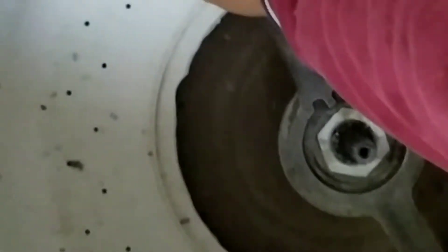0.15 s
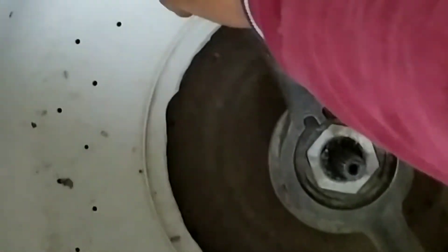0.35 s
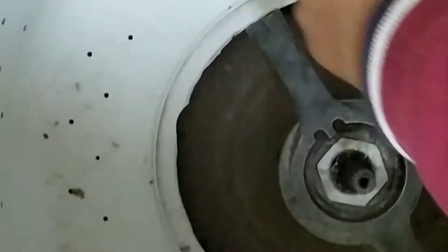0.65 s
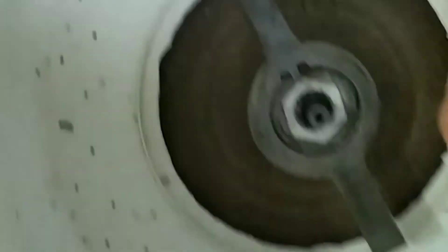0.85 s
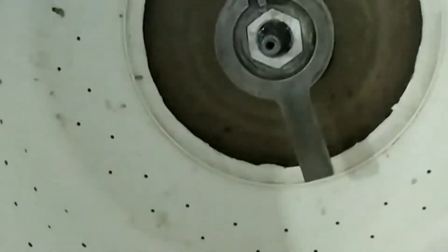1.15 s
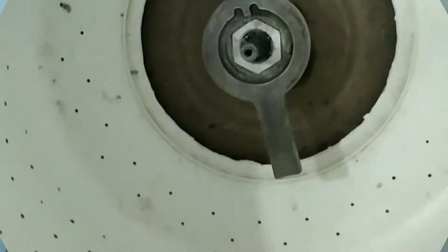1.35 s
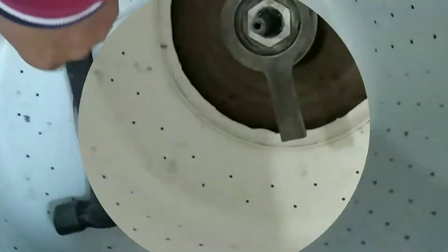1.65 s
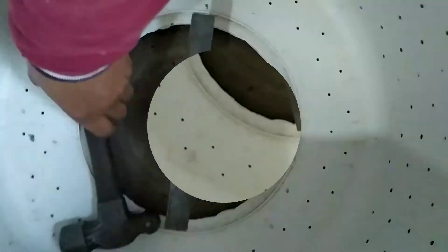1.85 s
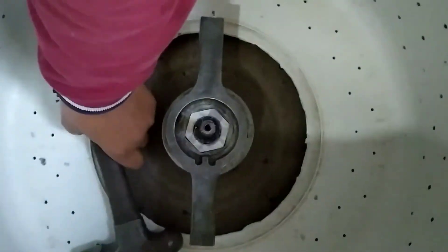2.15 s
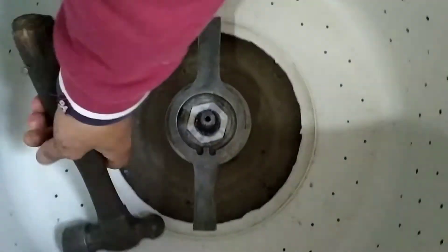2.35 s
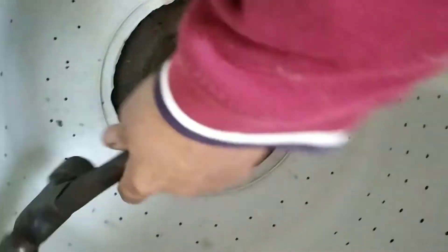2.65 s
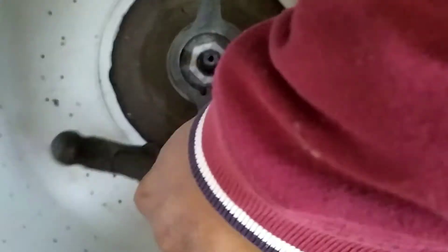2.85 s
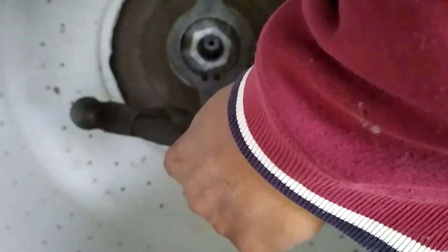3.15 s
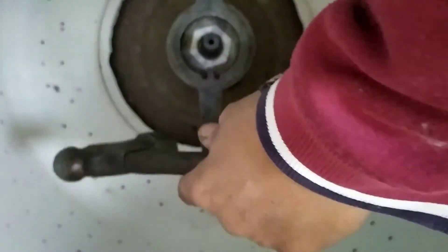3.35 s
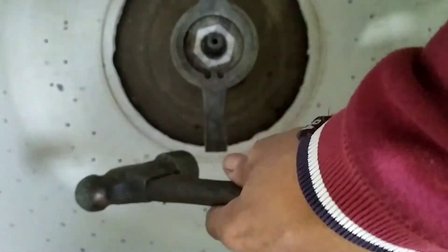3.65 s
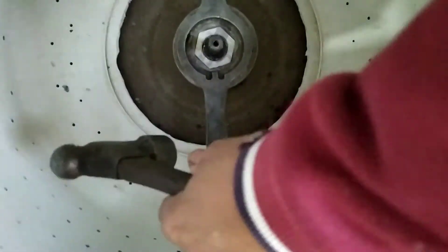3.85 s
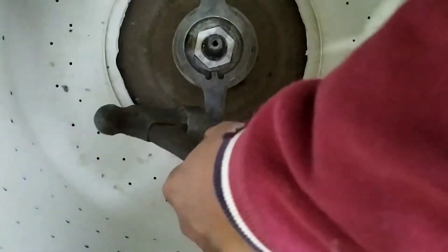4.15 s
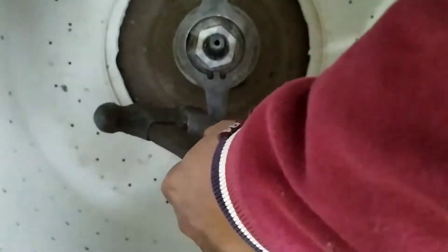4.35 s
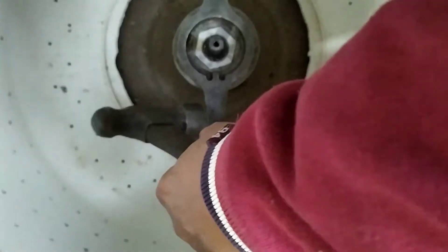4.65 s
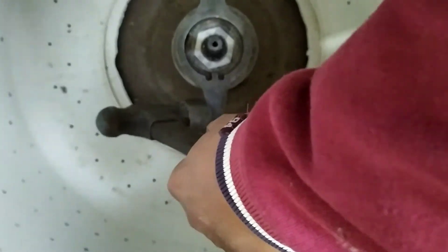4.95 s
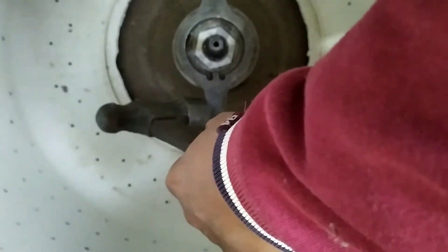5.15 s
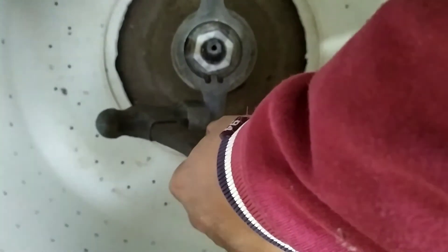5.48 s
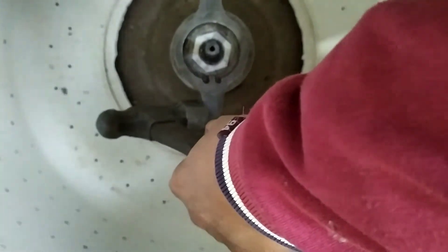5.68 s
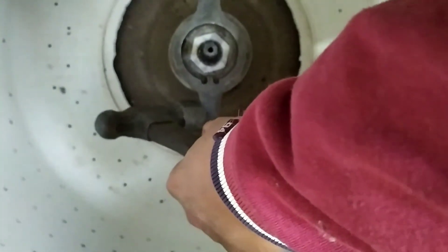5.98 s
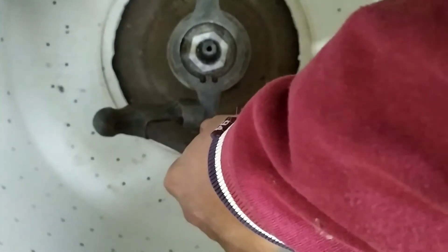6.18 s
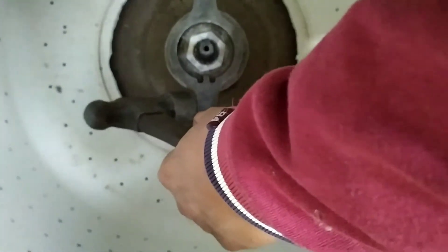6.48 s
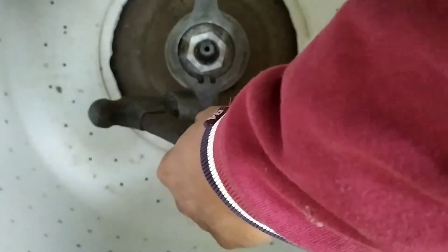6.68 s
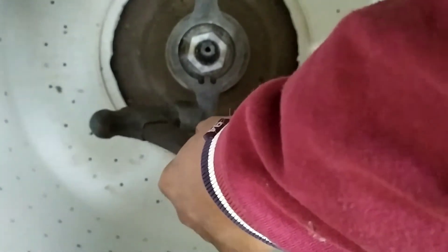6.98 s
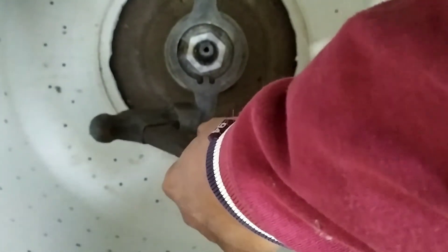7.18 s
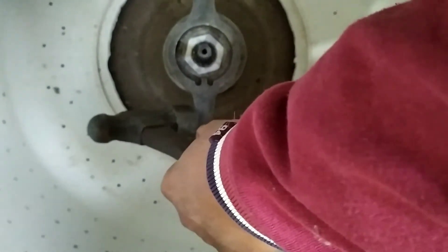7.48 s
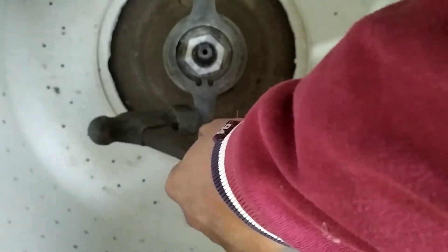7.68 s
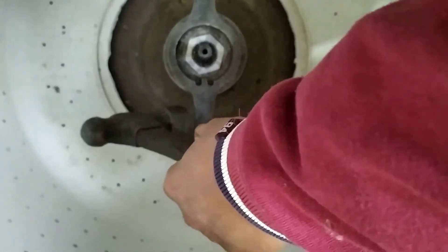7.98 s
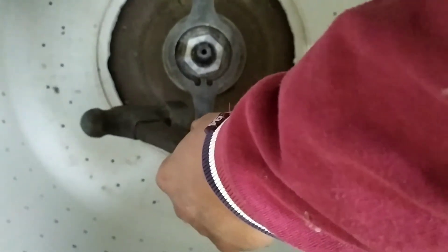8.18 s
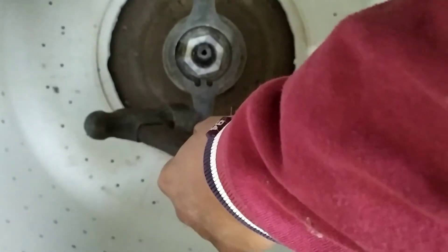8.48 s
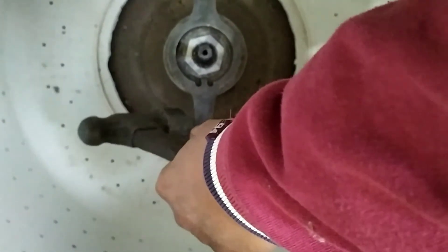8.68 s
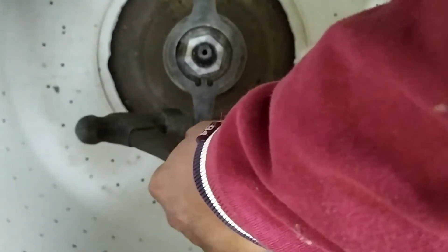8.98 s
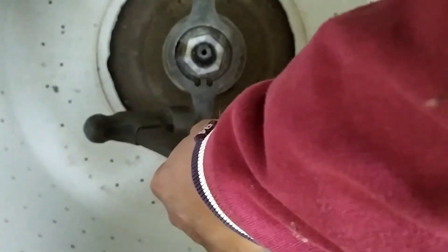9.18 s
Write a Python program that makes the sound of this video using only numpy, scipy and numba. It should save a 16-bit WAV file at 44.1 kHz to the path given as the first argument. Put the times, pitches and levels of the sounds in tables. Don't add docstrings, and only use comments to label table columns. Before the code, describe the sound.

Close, dry sound in a small metal tub. From 0 to 0.5 s, soft dull bumps of hands and sleeves, a faint knock and a small steel clink near 0.4 s, over low rumble and a fading deep thrum. Quiet rustle follows; around 1.7 s the background almost vanishes, then returns. Light bumps at 2.1 s lead to a firm hollow knock at 2.26 s and a harder one at 2.4 s. Quiet handling, with faint distant machinery appearing at 3.6 s. At 4.26 s a hammer clanks on a spanner, then a dense burst of hard blows and chattering bounces runs from 4.63 to 5.05 s, with brief high steel ringing. Small ticks fill the gap. Blows return at 6.8, 7.08 and 7.27 s, a duller one at 7.73 s, then 8.5, 8.9 and 9.3 s, each rattling briefly; the machinery nearly disappears around 8 s.

```python
import sys
import numpy as np
from scipy import signal
from scipy.fft import rfft, irfft, next_fast_len
from scipy.io import wavfile
from scipy.ndimage import uniform_filter1d, minimum_filter1d
from numba import njit

SR = 44100
rng = np.random.default_rng(int(sys.argv[2]) if len(sys.argv) > 2 else 0)


def unload_audio(sound):
    columns = np.transpose(np.atleast_2d(sound))
    steps = np.round(np.clip(columns, -1, 1) * 32767)
    wavfile.write(sys.argv[1], SR, steps.astype(np.int16))


def convert_level_to_amplitude(level_db):
    exponent = np.asarray(level_db, float) / 20
    return 10 ** exponent


N = 411453

# pitch_hz [Hz], level_db [dB], t60_s [s]
TUB_MODES = [(222, -10.5, 0.4), (330.2, -22.5, 0.089), (422, -16.5, 0.93), (463, 8.5, 1), (574.8, 4, 0.39),
             (707, 1.5, 0.61), (800, -12.5, 0.98), (820, -4.5, 0.36), (932, -36, 0.66), (1025, 8.5, 0.32),
             (1130, -20, 0.92), (1238, -18, 0.046), (1380, -14, 0.046), (1434, -20, 0.057),
             (1520, -11.5, 0.33), (1785, 4, 0.72), (1857, -7.5, 0.38), (2186, -5.5, 0.44),
             (2260, -30.5, 0.66), (2140, -15.5, 0.15)]
# pitch_hz [Hz], level_db [dB], t60_s [s]
CABINET_MODES = [(58.3, -11.5, 0.22), (86, -15, 0.17), (117.5, 8.5, 0.18), (110, 1.5, 0.21), (123, 2, 0.25),
                 (167, -8, 0.68), (200, -4.5, 0.12)]
# pitch_hz [Hz], level_db [dB], t60_s [s]
SPANNER_MODES = [(2525, -20, .2), (3160, -23, .12), (3709, -24, .15), (4188, -21, .1), (4727, -19, .13),
                 (4900, -16, .12), (5200, -17, .15), (5550, -24, .15), (6153, -24, .45), (6172, -32, .3),
                 (6761, -17, .08), (7251, -16, .3), (7285, -22, .25), (7790, -16, .15), (8100, -2, .22),
                 (8300, -9, .2), (8450, -11, .2), (8578, -7, .16), (8845, -9, .15), (9050, -12, .15),
                 (9200, -12, .12), (9943, -16, .12), (10900, -18, .15), (11560, -22, .12), (12030, -12, .2),
                 (12480, -11, .22), (13460, -9, .2), (14420, -14, .22), (14710, -14, .24)]
# start_s [s], level_db [dB]
CLINK = [
    (0.4219, -24.5),
]
# pitch_hz [Hz], level_db [dB], t60_s [s]
LOOSE_MODES = [(2280, -10, 0.25), (2890, -10, 0.2), (3170, -6, 0.47), (3710, -4, 0.36), (4695, 3, 0.23),
               (6200, -24, 0.87), (6172, -20, 0.55), (7230, -7, 0.16), (7770, 4.5, 0.2), (8110, -8, 0.48),
               (8560, -1, 0.13), (12470, -24, 0.25), (14370, -14, 0.22)]
# pitch_hz [Hz], level_db [dB per Hz]
RATTLE_SPECTRUM = [(88, -40.5), (150, -12), (271, -26.5), (450, 4), (748, 5), (1030, 6.5), (1410, -3),
                   (2160, -12.5), (4000, -25), (5600, -28), (8800, -71)]
CRACK_SPECTRUM = [(1470, -48), (2500, -8.5), (4190, -19), (4740, -7), (5620, -20.5), (6750, -32),
                  (8200, -6.5), (9000, -11), (9800, -26), (14500, -32.5), (15300, -49.5)]
RUMBLE_SPECTRUM = [(12, -53.5), (20, -35), (37, -20), (64, -1), (119, -1), (150, -18.5), (261, -13),
                   (285, -20.5), (400, -22), (520, -54.5), (880, -120)]
ROOM_SPECTRUM = [(88, -52), (150, -26.5), (263, -6), (286, -5.5), (538, -8), (769, -13), (999, -18.5),
                 (1100, -18), (4000, -47), (5200, -65.5), (8800, -120)]
RUSTLE_SPECTRUM = [(710, -33), (1200, -4), (1890, 1), (3030, -4), (4620, -6.5), (7750, 0.5), (12100, -5),
                   (14000, -7), (15800, -24)]
# pitch_hz [Hz], lead_rad [rad]
PORT_LEAD = [(250, 0), (500, .35), (1120, 1.7), (2070, 2.6), (3270, 1.2), (4800, .9), (7000, .2),
             (14000, .8)]
# pitch_hz [Hz], level_db [dB]
PORT_APART = [(30, -9.5), (70, -25.5), (140, -16.5), (280, -12), (1000, -1.5), (4000, 4), (8000, -8.5),
              (14000, -3)]
# start_s [s], stop_s [s], pitch_hz [Hz], level_db [dB]
SINGING = [
    (4.645, 4.702, 8100, -10),
    (4.9, 4.93, 8234, -22),
    (4.764, 4.87, 7251, -27),
    (5.02, 5.15, 6152, -37),
    (6.797, 6.826, 8101, -25),
    (7.12, 7.2, 6153, -41),
    (7.112, 7.15, 7252, -42),
    (6.81, 6.88, 6153, -44),
    (8.916, 8.953, 8102, -18),
    (8.93, 9.07, 6151, -29),
]
# pitch_hz [Hz], width_hz [Hz], level_db [dB]
WHINE_BANDS = [(566, 61, -4), (1010, 70, -7), (1300, 110, -14), (1740, 270, -11), (2200, 110, -12.5),
               (2500, 170, -9.5), (2770, 90, -20)]
# time_s [s], level_db [dB]
WHINE_COURSE = [
    (0, -99),
    (3.5, -88),
    (3.62, -66.5),
    (4.2, -76),
    (5.6, -75.5),
    (6.7, -75.5),
    (7.2, -74.5),
    (8.0, -95),
    (9.33, -83),
]
# start_s [s], level_db [dB], boom_db [dB re bump], scuff_db [dB re bump], t60_s [s]
BUMPS = [(0.076, -28.5, -14, -21, 0.17), (0.112, -39, 4.5, -14, 0.08), (0.139, -37.5, 7, -8, 0.16),
         (0.187, -31, -20, -11, 0.068), (0.292, -29, 0.5, -20, 0.032), (0.394, -28.5, -13, -17, 0.22),
         (0.417, -22, 5, -10, 0.11), (0.433, -32, 12, -21, 0.058), (0.487, -38.5, 4, -26, 0.12),
         (2.09, -33, -5.5, -5, 0.13), (2.126, -32.5, 12.5, -12, 0.088), (2.61, -50, -1, 0, .1),
         (2.75, -49, 0, 0, .1), (2.96, -52.5, -0.5, 4.5, .1)]
# pitch_hz [Hz], level_db [dB per Hz]
BUMP_SPECTRUM = [(76, -39), (130, 7.5), (254, -7.5), (411, 2), (700, -16), (1150, -23), (1600, -50),
                 (2260, -56), (2500, -42), (3250, -83), (5500, -120)]
# start_s [s], level_db [dB], boom_db [dB re tick], scuff_db [dB re tick], t60_s [s]
TICKS = [(1.18, -51.5, -20, 5, 0.024), (3.45, -50.5, -17, -22, 0.061), (3.586, -50.5, -2, -24.5, 0.068),
         (4.369, -25, -10.5, -30, 0.042), (4.428, -51.5, 5.5, -32.5, 0.059), (5.205, -47, -4, -34, 0.047),
         (5.28, -43, 0, -39.5, 0.052), (5.383, -41.5, -11.5, -39.5, 0.14),
         (5.499, -25.5, -24, -39.5, 0.062), (5.522, -30, -29, -39, 0.083), (5.584, -37.5, -22, -40, 0.075),
         (6.16, -32, -17, -39.5, 0.059), (7.461, -35, -20, -35, 0.075), (7.486, -36, -20, -39, 0.084),
         (7.566, -50.5, -12.5, -35, 0.044), (7.829, -27, -32.5, -25.5, 0.055),
         (8.644, -43.5, 8, -39, 0.044)]
# pitch_hz [Hz], level_db [dB per Hz]
TICK_SPECTRUM = [(150, -36), (250, -15), (480, 10), (763, 2), (1040, 9), (1320, -8), (2240, -12),
                 (2570, -30), (4250, -33), (5000, -34), (6500, -69), (11000, -120)]
# time_s [s], level_db [dB]
CROSSFADE = [
    (1.58, 2),
    (1.66, -8.5),
    (1.72, -33),
    (1.78, -14.5),
    (1.85, -7),
    (2.03, -0.5),
]
# start_s [s], level_db [dB], spanner_db [dB re knock], pitch_hz [Hz], ring_share [1]
KNOCKS = [
    (0.383, -36.5, 3, 480, 0.085),
    (2.2635, -7.5, -36.5, 339.3, 0.41),
    (2.346, -23.5, -30, 340, .7),
    (2.399, 8.5, -15.5, 361, 0.51),
]
# start_s [s], level_db [dB],
# spanner_db [dB re blow], pitch_hz [Hz], ring_share [1]
BLOWS = [(4.2562, 6.5, -8.5, 464.5, 0.39), (4.635, 9, -7, 454, 0.9), (4.749, 0, 0.5, 460, 0.66),
         (4.8945, 8.5, -3.5, 697, 0.6), (4.912, -1, -5, 688.5, 0.52), (4.93, -8.5, -7, 559.2, 0.49),
         (6.7915, 1, -11, 463, 0.19), (7.0775, 0.97, -10, 764.6, 0.34), (7.274, 2, -23.5, 895.5, 0.51),
         (7.731, -7, -64, 405.3, 0.33), (8.503, 1.14, -8, 463, 0.13), (8.908, 3.5, -1, 482, 0.3),
         (9.3, 7, -5.5, 739.5, 0.36), (4.263, -1, -3.5, 2110, 0.36), (4.641, -2, -10, 590.5, 0.75),
         (8.916, -5.5, -1, 1820, 0.27), (9.307, -4, -5.5, 1938, .3)]
# start_s [s], level_db [dB], spanner_db [dB re bounce], pitch_hz [Hz]
BOUNCES = [(5.017, -4.5, -21, 462), (5.499, -29.5, -52, 990), (6.16, -29, -51.5, 1078),
           (7.829, -25, -28, 980), (9.05, -46, -28, 499), (4.275, -12.5, -11.5, 385),
           (4.297, 1, -23.5, 468), (4.326, -9.5, -42, 455.5), (4.679, -2, -12, 696),
           (4.655, -3.5, -6.5, 574.6), (4.699, 4, -14, 454.4), (4.709, -4, -16, 559.2),
           (4.783, -7.5, -18, 456), (4.8115, -7.5, -2.5, 478.5), (4.829, -7, -15, 457),
           (4.845, -13.5, -12, 470), (4.861, -21, -16, 520), (4.792, -12.5, -22, 606),
           (4.957, -11.5, -28, 950), (4.97, -1, -8.5, 434), (5.001, -5.5, -26, 463),
           (5.024, -15, -26, 491.7), (5.036, -7, -28.5, 458), (5.049, -10, -17, 471),
           (6.8175, -6.5, -36, 422), (6.836, -13.5, -30.5, 460), (6.844, -8, -40, 447),
           (6.85, -17.5, -37.5, 1010), (6.87, -21.5, -31, 698), (7.09, -9, -14.5, 556),
           (7.104, -8.5, -28.5, 959), (7.127, -13.5, -27, 966), (7.299, -8, -17, 473),
           (7.348, -21.5, -57, 453), (7.374, -24.5, -46, 437), (7.749, -19.5, -45, 430.7),
           (8.524, -9, -27.5, 454), (8.549, -14, -26, 409.5), (8.943, -3, -27.5, 510),
           (8.962, -17, -13, 700), (8.977, -10.5, -18.5, 1005), (8.985, -15, -13.5, 468),
           (8.995, -22, -12, 995), (9.005, -24, -15, 950)]
# time_s [s], tub_shake_db [dB], sleeve_db [dB]
ARM = [(0, -45.5, -77), (.19, -53, -63), (.33, -46.5, -73), (.46, -63, -72), (.62, -55.5, -73),
       (.85, -58.5, -67.5), (1.1, -58, -66), (1.6, -78, -68.5), (2, -56.5, -73), (2.1, -40.5, -61),
       (2.3, -50.5, -60), (2.401, -25.5, -47.5), (2.5, -73.5, -66.5), (2.77, -70, -63), (3.04, -62, -67),
       (3.07, -62, -76), (4.199, -62.5, -77), (4.3, -83, -93.5), (9.33, -78.5, -93)]
STILL_DB = dict(rumble=-63.5, room=-75.5, rustle=-74.5, hum=-67.5)
# gain_db [dB re touch], t60_s [s]
SHUDDER = dict(rumble=(-21.5, 1.7), room=(-54.5, 1.5), hum=(-55.5, 0.21))
# pitch_hz [Hz], level_db [dB]
CLATTER_LEVELS = [(1300, -1.5), (2100, 0.5), (3300, -7), (4700, -8), (5700, -17), (6800, -18), (8300, -5),
                  (9200, -10.5)]

HUM_HZ, HUM_WIDTH_HZ = 260, 22
RATTLE_T60_S = .052
BOUNCE_RING = 0.48
KNOCK_BOOM_DB, BLOW_BOOM_DB, BOUNCE_BOOM_DB = -16.5, -26, -16
SHAKE_ROOM_DB, WHINE_ROOM_DB = -12, 3.5
SHUDDER_RISE_S = 0.0073
LIMIT, LOOK_AHEAD_S, SQUEEZE = 0.8, 0.013, 0.35
LEAD_S, LEAD_DB = 0.0039, -24
BRIGHT_HZ = 9300
THRUM_HZ, THRUM_DB, THRUM_T60_S = 64.47, -28.5, 0.93
FLOOR_MONO_HZ = 6300
CLATTER_DB, CLATTER_T60_S = -19.5, .05
SING_RISE_S, SING_SAG_DB_PER_S, SING_FALL_DB_PER_S = .005, 170, 450


def on_log(table, hz):
    table_hz, value = np.transpose(table)
    return np.interp(np.log(hz + 1), np.log(table_hz + 1), value)


def colour(table):
    size = next_fast_len(N)
    white = rfft(rng.standard_normal((2, size)))
    y = irfft(white * convert_level_to_amplitude(on_log(table, np.fft.rfftfreq(size, 1 / SR))), size)[:, :N]
    return y / y.std()


def walk(rate_hz):
    hold = int(SR / rate_hz)
    steps = np.repeat(rng.standard_normal(N // hold + 1), hold)
    return uniform_filter1d(uniform_filter1d(steps, hold), hold)[:N]


def high_pass(x, order, hz):
    return signal.sosfilt(signal.butter(order, hz, "high", fs=SR, output="sos"), x)


@njit
def ring(x, touch, pole, gain, turn):
    out, z = np.zeros((2, len(x))), 0 * turn
    for i in range(len(x)):
        k = touch[i]
        for m in range(len(z)):
            z[m] = z[m] * pole[k, m] + x[i] * gain[k, m]
            out[0, i] += z[m].imag
            out[1, i] += (z[m] * turn[m]).imag
    return out


def body(modes, x, touch, share, scatter_db, detune, spot_db=0):
    hz, db, t60 = np.transpose(modes)
    chance = rng.standard_normal((len(share), 2, len(hz)))
    t60 = np.outer(np.clip(share, .02, 3), np.clip(t60, .01, 1.5))
    decay = np.log(1000) / (t60 * SR)
    pole = np.exp(2j * np.pi * hz * (1 + detune * chance[:, 0]) / SR - decay)
    turn = np.exp(2j * np.pi * rng.random(len(hz)))
    gain = convert_level_to_amplitude(db + spot_db + scatter_db * chance[:, 1])
    return ring(x + 1e-18, touch, pole, gain, turn)


def bursts(s, db, t60, rise_s):
    env, t = np.zeros(N), np.arange(SR // 2) / SR
    for start, peak, t60_s in zip((s * SR).astype(int), convert_level_to_amplitude(db), t60 * np.ones(len(s))):
        burst = peak * (1 - np.exp(-t / rise_s)) * 1000. ** (-t / t60_s)
        env[start:start + len(t)] += burst[:N - start]
    return env


def push(s, db, width_s):
    x = np.zeros(N)
    x[(s * SR).astype(int)] = convert_level_to_amplitude(db)
    shape = np.hanning(int(width_s * SR) + 3)
    return np.convolve(x, shape / shape.sum())[:N]


def touches():
    rows = []
    for table, boom_db in ((KNOCKS, KNOCK_BOOM_DB), (BLOWS, BLOW_BOOM_DB), (BOUNCES, BOUNCE_BOOM_DB)):
        for s, db, *rest in table:
            rows.append((s, db, boom_db, *rest, BOUNCE_RING)[:6])
    return np.transpose(sorted(rows))


def shudder(s, db, layer):
    x, (gain_db, t60) = np.zeros(N), SHUDDER[layer]
    x[(s * SR).astype(int)] = convert_level_to_amplitude(2 * (db + gain_db))
    fall = np.exp(-2 * np.log(1000) / (t60 * SR))
    rise = np.exp(-1 / (SHUDDER_RISE_S * SR))
    return signal.lfilter([1 - rise], [1, -rise], signal.lfilter([1], [1, -fall], x))


def behind():
    t = np.arange(N) / SR
    s, db, boom_db = touches()[:3]
    at, shake_db, sleeve_db = np.transpose(ARM)
    shake = convert_level_to_amplitude(2 * np.interp(t, at, shake_db))
    sleeve = convert_level_to_amplitude(2 * np.interp(t, at, sleeve_db))
    far = convert_level_to_amplitude(2 * (np.interp(t, *np.transpose(WHINE_COURSE)) + WHINE_ROOM_DB))

    def still(layer, power):
        return np.sqrt(convert_level_to_amplitude(2 * STILL_DB[layer]) + power)

    low = still("rumble", shake + shudder(s, db + boom_db, "rumble"))
    mid = still("room", shake * convert_level_to_amplitude(2 * SHAKE_ROOM_DB) + far + shudder(s, db, "room"))
    w = HUM_WIDTH_HZ
    hum = colour([(HUM_HZ - 4 * w, -60), (HUM_HZ - w, -12), (HUM_HZ, 0), (HUM_HZ + w, -12), (HUM_HZ + 4 * w, -60)])
    rumble = colour(RUMBLE_SPECTRUM) * low * convert_level_to_amplitude(2.0 * walk(28))
    room = colour(ROOM_SPECTRUM) * mid * convert_level_to_amplitude(0.5 * walk(18))
    rustle = colour(RUSTLE_SPECTRUM) * still("rustle", sleeve * convert_level_to_amplitude(5.0 * walk(25)))
    return rumble + room + rustle + hum * still("hum", shudder(s, db, "hum"))


def whine():
    out = 0
    for hz, w, db in WHINE_BANDS:
        band = colour([(hz - 3 * w, -50), (hz - w / 2, -5), (hz, 0), (hz + w / 2, -5), (hz + 3 * w, -50)])
        out = out + band * convert_level_to_amplitude(db + 7.0 * walk(7))
    return out * convert_level_to_amplitude(np.interp(np.arange(N) / SR, *np.transpose(WHINE_COURSE)))


def thrum():
    t = np.arange(N) / SR
    level = convert_level_to_amplitude(THRUM_DB + 5.0 * walk(10)) * 1000. ** (-t / THRUM_T60_S)
    return level * np.sin(2 * np.pi * THRUM_HZ * t)


def light(contacts, spectrum):
    s, db, boom_db, scuff_db, t60 = np.transpose(contacts)
    shake = colour(spectrum) * bursts(s, db - 2.5, t60, 0.00043)
    boom = body(CABINET_MODES, push(s, db + boom_db - 11, 0.01), np.zeros(N, int), np.ones(1), 0, 0)
    return shake + boom + colour(RUSTLE_SPECTRUM) * bursts(s, db + scuff_db - 7, 0.046, 0.0012)


def clink():
    s, db = np.transpose(CLINK)
    tap = push(s, db - 11, .00003)
    return body(LOOSE_MODES, tap, np.zeros(N, int), np.ones(1), 0, 0) * [[1], [.25]]


def singing():
    t, out = np.arange(N) / SR, 0
    for s, stop, hz, db in SINGING:
        sag_db = SING_SAG_DB_PER_S * np.clip(t - s, 0, stop - s)
        fall_db = SING_FALL_DB_PER_S * np.clip(t - stop, 0, 1)
        rise = np.clip((t - s) / SING_RISE_S + 1, 0, 1)
        out = out + rise * convert_level_to_amplitude(db - sag_db - fall_db + 6.0 * walk(55)) * np.sin(2 * np.pi * hz * t)
    return out


def clatter(x, touch, count=44):
    hz = np.geomspace(1300, 9200, count) * (1 + .02 * rng.standard_normal(count))
    t60 = CLATTER_T60_S * convert_level_to_amplitude(4 * rng.uniform(-1, 1, count))
    modes = np.transpose([hz, on_log(CLATTER_LEVELS, hz) + CLATTER_DB, t60])
    return body(modes, x, touch, np.ones(touch.max() + 1), 5.0, .03)


def air_knock(s, db, hard_db, knock_hz, touch):
    cycles = 12.0 + 0.21 * (db - hard_db)
    loss = np.log(1000) * (knock_hz / cycles)[:, None] / SR
    pole = np.exp(2j * np.pi * knock_hz[:, None] / SR - loss)
    flat, turn = 1 + 0 * loss, np.array([1j])
    spot = ring(push(s, 2 * db - hard_db - 14, 0.00017) + 1e-18, touch, pole, flat, turn)[0]
    knock = ring(spot, touch, pole, 2 * np.e * loss, turn)
    knock = knock + ring(push(s, db - 11, 0.0007) + 1e-18, touch, pole, flat, turn)
    return high_pass(knock, 3, 290.)


def steel_crack(s, db, steel_db):
    grit = colour(CRACK_SPECTRUM) * convert_level_to_amplitude(1.5 * walk(200))
    bright = high_pass(grit, 4, BRIGHT_HZ)
    dull = signal.sosfilt(signal.butter(4, BRIGHT_HZ, fs=SR, output="sos"), grit)
    bright_db = db + .6 * np.clip(db, -30, 0) + steel_db - 3
    return dull * bursts(s, db + steel_db - 6, 0.04, 0.0021) + bright * bursts(s, bright_db, 0.023, 0.0014)


def blows():
    s, db, boom_db, steel_db, knock_hz, steel_share = touches()
    touch = np.clip(np.searchsorted(s * SR, np.arange(N) + 1) - 1, 0, None)
    chatter, even = rng.standard_normal(N), np.ones(len(s))
    hard_db = db + 30 * np.clip(np.log2(knock_hz / 430), -1, 0) + .3 * np.clip(db + 8, -30, 0)
    knocks = push(s, hard_db - 25.5, 0.00015)
    knocks = knocks + convert_level_to_amplitude(-29.0) * chatter * bursts(s, hard_db - 8.5, RATTLE_T60_S, 0.00091)
    octaves = np.log2(np.array(TUB_MODES)[:, 0] / knock_hz[:, None])
    short_modes = np.minimum(TUB_MODES, [SR, SR, .3])
    tub = body(short_modes, knocks * 1.2, touch, .14 * even, 3.0, .03, -5.0 * np.abs(octaves))
    knock = air_knock(s, db, hard_db, knock_hz, touch)
    landing = bursts(s, hard_db - 7.5, RATTLE_T60_S, 0.00037)
    graze = bursts(s - LEAD_S, hard_db + LEAD_DB, .03, 0.0011)
    rattle = colour(RATTLE_SPECTRUM) * convert_level_to_amplitude(4.5 * walk(220)) * (landing + graze)
    boom = body(CABINET_MODES, push(s, db + boom_db - 11, .004), touch, even, 2.0, .03) * convert_level_to_amplitude(3 * walk(35))
    taps = push(s, db + steel_db - 22.5, .00003)
    taps = taps + convert_level_to_amplitude(-19.5) * chatter * bursts(s, db + steel_db - 7.5, 0.042, 0.00032)
    steel = body(SPANNER_MODES, taps, touch, steel_share, 3.0, .001) * convert_level_to_amplitude(5.0 * walk(60))
    crack = steel_crack(s, db, steel_db)
    tail = colour(ROOM_SPECTRUM) * convert_level_to_amplitude(4.0 * walk(40)) * bursts(s, db - 33.5, 0.31, 0.044)
    mix = tub + knock + rattle + boom + steel + clatter(taps + knocks, touch) + crack + tail
    return high_pass(mix, 4, 75.)


def scene():
    size = next_fast_len(N + SR // 2)
    hz = np.fft.rfftfreq(size, 1 / SR)
    fade = convert_level_to_amplitude(np.interp(np.arange(N) / SR, *np.transpose(CROSSFADE)))
    lead = np.exp(.5j * on_log(PORT_LEAD, hz))

    def ports(x):
        shared, other = rfft(x, size)
        other = other * convert_level_to_amplitude(on_log(PORT_APART, hz))
        return np.array([(shared + other) * lead * convert_level_to_amplitude(0.5), (shared - other) / lead])

    faint = ports(clink() + light(BUMPS, BUMP_SPECTRUM) + whine() + fade * behind())
    near = ports(blows() + singing() + thrum() + light(TICKS, TICK_SPECTRUM))
    mid = faint.mean(axis=0)
    return irfft(near + mid + (faint - mid) / (1 + (hz / FLOOR_MONO_HZ) ** 20), size)[:, :N]


def roll_off(x):
    return signal.sosfilt(signal.butter(12, 15940, fs=SR, output="sos"), x)


def record(dry):
    reach = int(LOOK_AHEAD_S * SR)
    gain = np.minimum(1, LIMIT / (np.abs(dry).max(axis=0) + 1e-9)) ** SQUEEZE
    gain = uniform_filter1d(minimum_filter1d(gain, reach), reach)
    limited = .92 * np.tanh(1.051 * gain * dry)
    top_cut = signal.ellip(8, .2, 70, 15300, fs=SR, output="sos")
    mix = high_pass(signal.sosfilt(top_cut, limited), 2, 45.)
    return roll_off(mix)


dry = scene()
out = record(dry)
unload_audio(out)
```